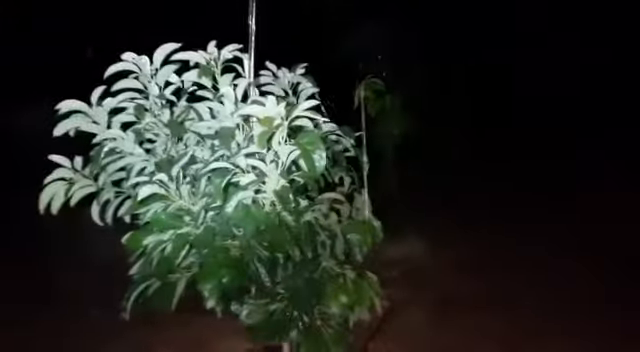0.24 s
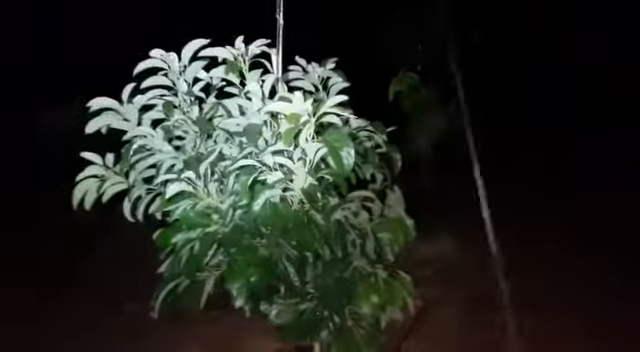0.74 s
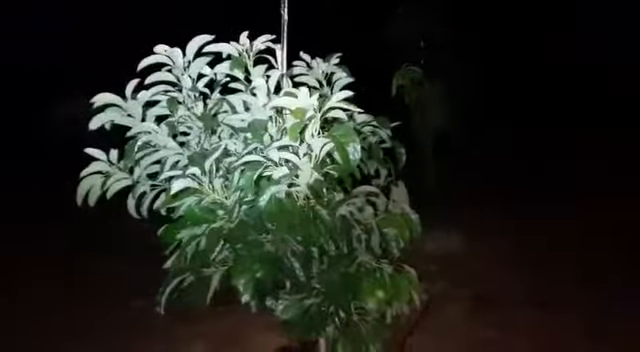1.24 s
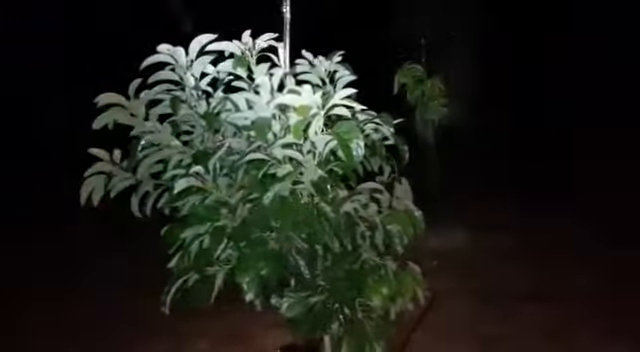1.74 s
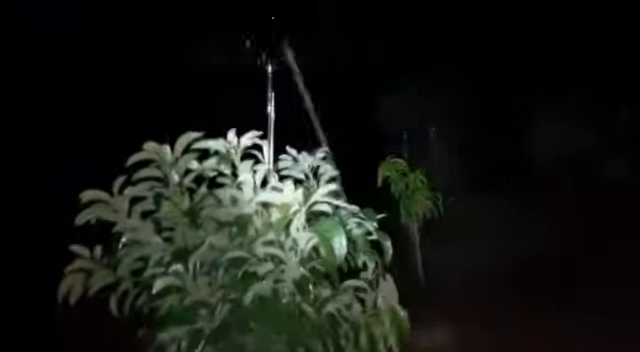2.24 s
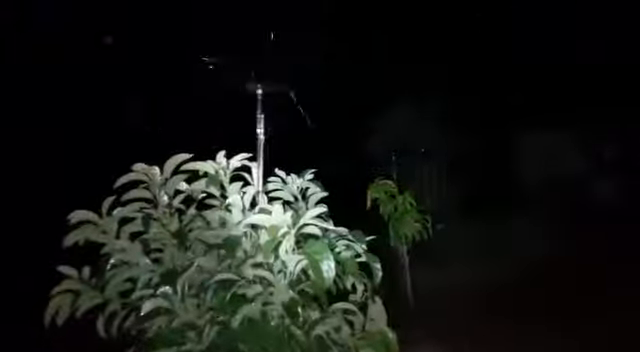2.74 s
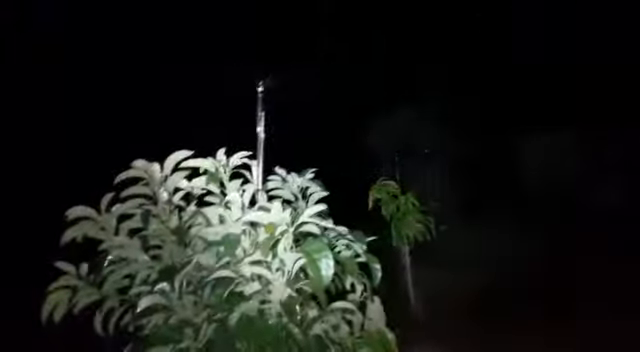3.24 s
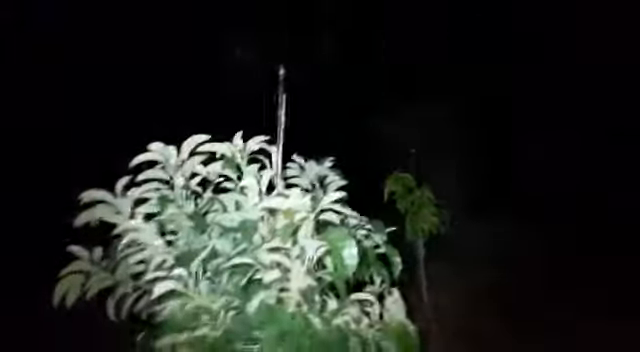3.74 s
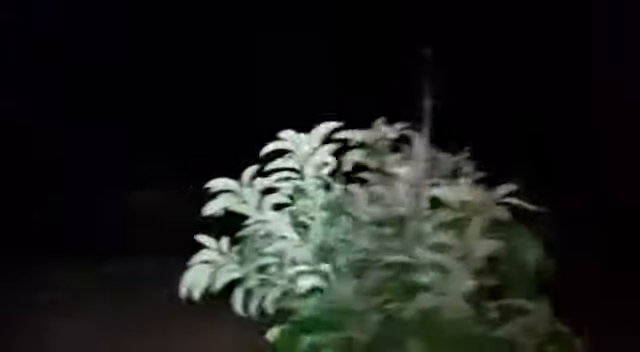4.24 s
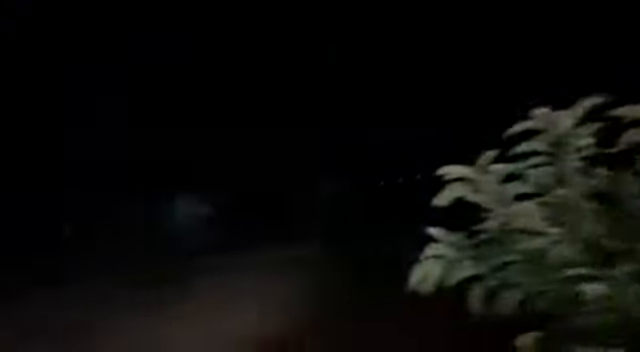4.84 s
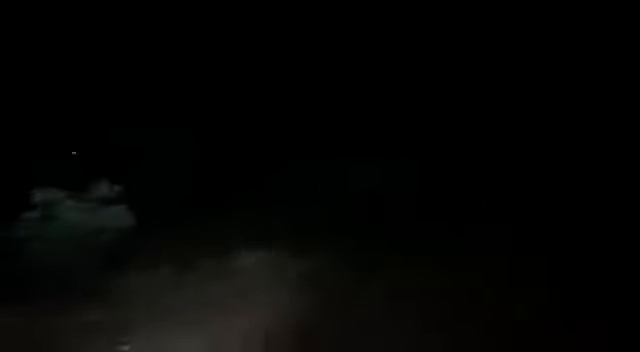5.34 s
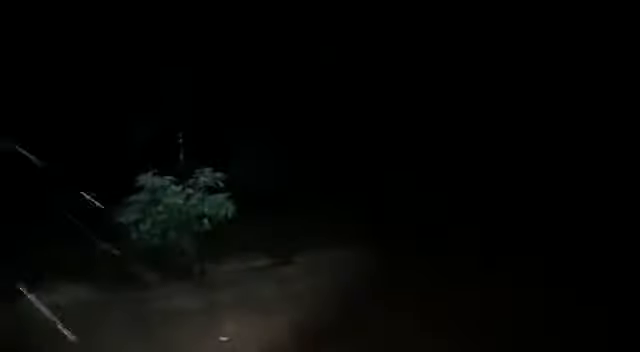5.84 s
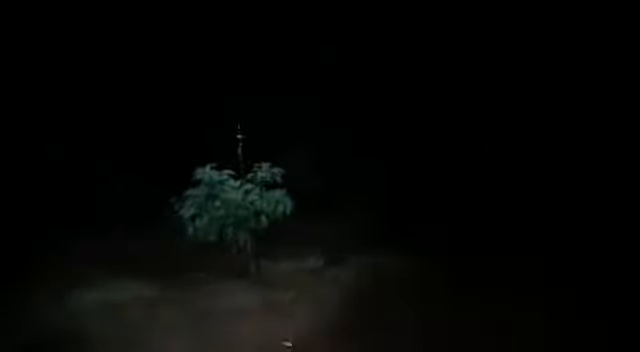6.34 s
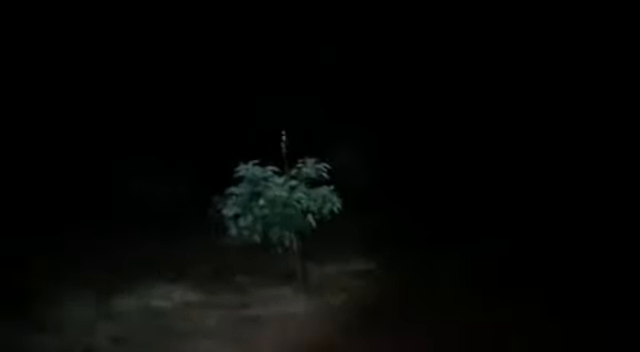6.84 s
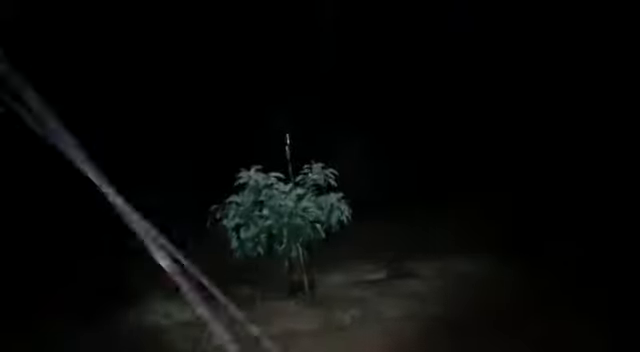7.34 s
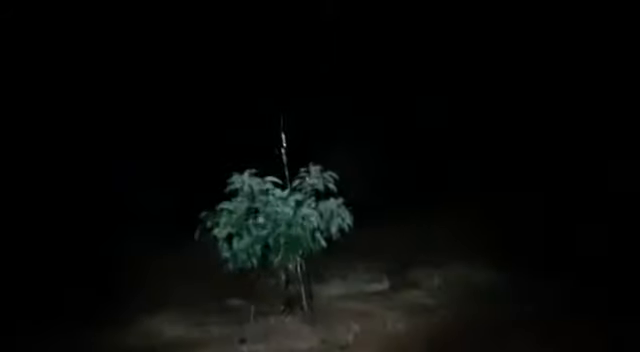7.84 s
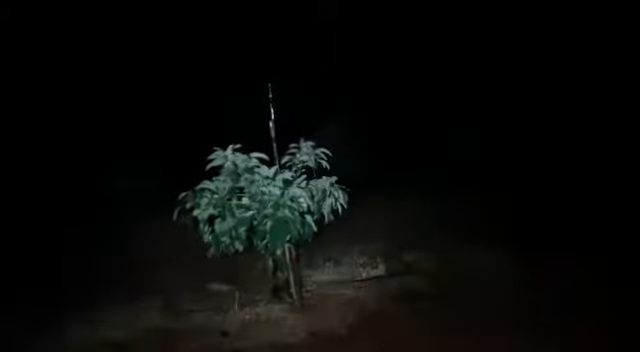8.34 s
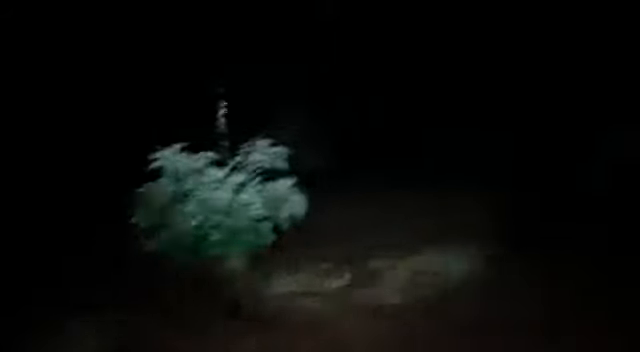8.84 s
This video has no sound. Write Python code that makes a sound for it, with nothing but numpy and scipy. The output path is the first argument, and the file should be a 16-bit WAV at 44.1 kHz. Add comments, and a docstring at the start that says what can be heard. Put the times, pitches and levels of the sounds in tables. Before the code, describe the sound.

Orchard sprinklers tick rapidly and overlap over a steady water hiss, with dripping leaves, then footsteps, snapping twigs and brief low wind thumps.

```python
"""Impact sprinklers in an orchard at night

Three sprinklers tick: each arm cuts its jet, knocks the plastic head with a ring of decaying tones, and throws
a splash of broken-up noise. Spray hisses as patchy noise, and drops tap on leaves as short pops.
Low noise in gusts is wind on the two ports of a hand-held phone, which turns and is carried along.
Feet shuffle through wet litter as swelling noise, and a few twigs snap as wide-band cracks."""
import sys
import numpy as np
from scipy import signal
from scipy.fft import rfft, irfft, next_fast_len
from scipy.io import wavfile
from scipy.ndimage import uniform_filter1d, map_coordinates

SR = 44100
rng = np.random.default_rng(int(sys.argv[2]) if len(sys.argv) > 2 else 0)


def waveform_to_disk(signal):
    """Save audio, clipped to [-1, 1], as 16-bit WAV at the path in sys.argv[1]."""
    frames = np.transpose(np.atleast_2d(signal))
    scaled = np.clip(frames, -1, 1) * 32767
    samples = np.round(scaled).astype(np.int16)
    wavfile.write(sys.argv[1], SR, samples)


N = 400595
LEAD_S = 0.008  # every short sound's row starts this long before its event


def sprinklers():
    """Three arms beat at their own rates, each heard from its own bearing."""
    # each arm's beat: start_s, swing_period_s
    arms = [(0, .1272), (0, .138), (7.5757, .1275)]
    # how each sprinkler runs as it turns: time_s, strike_late_ms, knock_gain_db, splash_gain_db
    runs = [
        [(0, 34, -34, -36.5), (.2, 28.4, -35, -43), (.5, 32.5, -28, -33.5), (.8, 37.5, -29.5, -38),
         (1.18, 32.6, -27.5, -37.5), (1.55, 30, -28.5, -33.5), (1.75, 31, -29.5, -36.5),
         (2.05, 28.8, -30, -39.5), (2.44, 29, -29.5, -35), (2.58, 29, -26.5, -41), (2.95, 35, -31.5, -39),
         (3.2, 35.3, -31.5, -36.5), (3.5, 37, -25.5, -42), (3.7, 37.3, -30.5, -39.5),
         (4.25, 36.6, -29.5, -38.5), (4.65, 33, -31, -35.5), (5, 33, -34, -38.5), (5.12, 33.6, -33.5, -44),
         (5.5, 27.7, -30, -31.5), (5.9, 24.5, -30, -45), (6.02, 22, -32, -45), (6.14, 28.4, -40, -43.5),
         (6.9, 27.7, -44, -42.5), (7.15, 38, -48, -60), (7.5, 32.5, -32.5, -51), (8.05, 35, -37, -36.5),
         (8.17, 27, -38, -44.5), (8.55, 19.3, -41, -38), (8.8, 26, -40, -49), (9.08, 29, -48, -35.5)],
        [(0, 12.5, -30, -37), (.3, 10, -40, -39.5), (.7, 7.5, -28, -43), (.9, 9, -39, -42),
         (1.2, 9.5, -30, -39.5), (1.4, 7, -37, -38.5), (1.53, 6, -28, -42.5), (2.6, 7.5, -31, -41.5),
         (2.77, 5.5, -29, -40), (2.9, 2, -33.5, -37.5), (3.4, 2, -31, -43), (3.6, 1, -29.5, -34),
         (3.85, -1, -33, -38), (4.13, 3.5, -30, -40), (4.6, -2.5, -44, -39.5), (4.97, 6, -25.5, -37),
         (5.35, 11.5, -29.5, -42), (5.85, 7.5, -36.5, -41), (6.2, -.5, -31, -36), (6.65, 9.5, -38, -42.5),
         (6.95, 15.5, -36, -40), (7.2, 16, -33, -37), (7.45, 13.5, -35, -51), (7.75, 9.5, -37, -40.5),
         (8.05, 7.5, -42, -45.5), (8.4, 3, -36, -51), (9.08, 3.5, -34, -46)],
        [(7.5, 2, -45, -48), (8, 0.5, -37, -43), (8.4, -0.5, -41, -43), (8.7, 4, -36.5, -46),
         (9.08, 2.5, -50, -58)],
    ]
    # where each stands as the phone turns: time_s, left_lag_ms
    bearings = [
        [(0, -0.052), (3.8, -0.083), (4.9, 0.3), (5.6, 0.49), (6.4, 0.53), (7, 0.44), (9, 0.22)],
        [(0, -0.31), (2.2, -0.314), (4.5, -.37), (5.7, -0.41), (6.6, -0.36), (9, -0.21)],
        [(7.5, -0.071), (9, -0.024)],
    ]
    # ringing tones of each plastic head: nominal pitch_hz, relative_level_db, t60_s
    heads = [
        [(1600, -10.5, 0.044), (1789, -14.5, 0.079), (1990, -9, 0.04), (2730, -16.5, 0.079), (3640, -3, 0.016),
         (4600, 19, 0.0046)],
        [(2126, -14, 0.052), (2880, -9, 0.039), (3660, -17, 0.015), (4950, 11.5, 0.0061), (9350, 6.5, 0.0096),
         (10500, -4.5, 0.016)],
        [(2200, -8, .03), (3570, 5.5, 0.041), (4300, 5.5, .015), (8200, -7.5, .012), (9800, 14.5, 0.01)],
    ]
    return sum(sprinkler(*one) for one in zip(arms, runs, bearings, heads))


def sprinkler(arm, run, bearing, head):
    """The arm slices the jet, knocks the head, the splash spreads, and the arm clips the jet again swinging back."""
    # colour of the splash: pitch_hz, relative_level_db
    splash_colour = [(300, -14.5), (900, -6.5), (1600, -2.5), (3000, 2), (6000, 6), (11000, 3),
                     (16000, -0.5)]
    s, knock_db, splash_db = strikes(arm, run)[..., None]
    t = event_time(0.09)

    def noise():
        white = rng.standard_normal((len(s), len(t)))
        return unit(filtered(white, lambda hz: amp(along(splash_colour, hz))))

    # the head rings a little differently at every blow
    ring = 0
    for hz, db, t60 in head:
        level = amp(db + 2.5 * rng.standard_normal(s.shape))
        detune = 1 + 0.016 * rng.standard_normal(s.shape)
        cycles = hz * t * detune + rng.random(s.shape)
        ring = ring + level * puff(t, 0.0012, t60) * np.sin(2 * np.pi * cycles)

    rattle = noise()
    crack = amp(2.0) * burst(puff(t, 0.0005, 0.011), rattle)
    rebound_gain = amp(-11 + 4.4 * np.clip(rng.standard_normal(s.shape), -2, 1))
    rebound = rebound_gain * puff(t - 0.0065, 0.0002, 0.013) * rattle
    blow = amp(-7) * ring + crack
    even_blow = unit(blow) * np.sqrt(np.mean(blow ** 2))  # same energy at each strike
    knock = amp(knock_db) * (even_blow + rebound)

    slice_in = amp(3.5) * puff(t + 0.0058, 0.0038, 0.026)
    spread = puff(t, 0.00074, 0.13)
    swing_back = amp(-13.0) * puff(t - 0.056, 0.0014, 0.039)
    jet = slice_in + spread + swing_back

    shared = splintered(noise(), depth_db=2.5)
    ears = []
    for _ in "lr":
        own = splintered(noise(), depth_db=6.0)
        ears.append(knock + amp(splash_db) * jet * (0.5 * shared + 0.84 * own))
    return place(s[:, 0], *ears, np.interp(s[:, 0], *np.transpose(bearing)))


def strikes(arm, run):
    """Times, knock dB and splash dB of one arm: an even beat, shifted by its lateness, with uneven force."""
    knock_varies_db, splash_varies_db = 1, 1.5
    start_s, period_s = arm
    beat = np.arange(start_s, N / SR - 0.03, period_s)
    late_ms, knock_db, splash_db = [c[np.round(beat * SR).astype(int)] for c in curve(run)]
    u = rng.standard_normal((len(beat), 2))
    knock_db = knock_db + knock_varies_db * u[:, 0]
    splash_db = splash_db + splash_varies_db * u[:, 1]
    return np.array([beat + late_ms / 1000, knock_db, splash_db])


def drops():
    """The nearest taps one by one, and a scatter of fainter ones all round; big low drops are nearly all pop."""
    # loudest taps on near leaves: time_s, relative_level_db, centre_hz, left_lag_ms
    near_taps = [(0.196, -34.5, 8900, -0.16), (0.504, -36, 3400, 0.25), (0.574, -30, 7600, -.45),
                 (0.742, -37, 1270, 0.29), (0.906, -36, 1250, -0.14), (1.033, -30.5, 6900, -.34),
                 (1.365, -32, 7700, 0.072), (1.478, -30.5, 8750, 0.46), (2.02, -35, 7500, -0.52),
                 (2.129, -31.5, 7300, .05), (2.443, -32.5, 2200, 0), (2.564, -35, 10250, -.05),
                 (2.671, -32, 7100, -.05), (3, -31.5, 7100, 0.047), (3.162, -37, 8100, -0.67),
                 (3.448, -35, 7440, -0.32), (3.487, -30, 4800, 0.5), (3.656, -36.5, 1600, -0.25),
                 (3.669, -33, 7500, .11), (3.778, -33, 5700, -.09), (3.941, -33.5, 7900, -0.73),
                 (4.328, -32.5, 8000, .2), (4.559, -28.5, 5900, -0.11), (4.697, -38, 5900, -.3),
                 (5.289, -34, 5300, -0.61), (5.743, -32.5, 1700, 0.57), (6.467, -33, 5730, -.34),
                 (6.497, -28, 7440, -0.27), (6.67, -32, 7500, -.11), (6.946, -33, 6750, -0.31),
                 (7.288, -31.5, 3600, 0.3), (7.42, -32, 8400, 0), (7.571, -29.5, 7500, -0.11),
                 (8.382, -30, 7200, -0.31), (8.489, -38, 6600, .25), (8.866, -31.5, 8100, -.43)]
    s, db, hz, lag_ms = np.transpose(near_taps)
    pop_db = -5 * np.log2(hz / 8000)
    near = ticks(s, db - pop_db, hz, 0 * s, lag_ms, rise=0.00037, t60=0.016, octaves=1.0,
                 pop_db=pop_db[:, None] + 5.5, tail_db=-14.0, length=1 / 20)
    u = rng.random((round(50 * N / SR), 4))  # 50 faint taps a second
    s = u[:, 0] * N / SR
    db = -50.5 + 12 * u[:, 1] ** 2
    hz = 2500 * 5 ** u[:, 2]
    lag_ms = 1.034 * u[:, 3] - 0.45
    faint = ticks(s, db, hz, 0 * s, lag_ms, rise=0.0005, t60=0.015, octaves=0.34,
                  pop_db=-5, tail_db=-20.5, length=1 / 40)
    return near + faint


def feet():
    """Soles land with a dull push, press the soil and crunch wet leaves, which crackle."""
    # soles landing: time_s, relative_level_db, centre_hz
    thuds = [(0.406, -48.5, 347), (3.577, -53, 170), (4.838, -43, 855), (5.098, -34, 320),
             (5.399, -42, 420), (5.453, -42, 546), (5.485, -37, 412), (5.748, -40, 218),
             (6.886, -43.5, 404), (7.196, -38, 390), (7.499, -48.5, 167), (7.895, -46.5, 570),
             (8.069, -34, 250), (8.1, -32.5, 191), (8.508, -38, 283), (8.617, -34.5, 184),
             (8.673, -41.5, 336)]
    # weight coming down on a foot: peak_s, fade_10db_s, soil_db, leaves_db, wet_crackle_db
    steps = [(.41, 0.11, -58, -53, -53), (4.63, 0.14, -59, -47.5, -54), (5.093, 0.11, -52.5, -46.5, -44),
             (5.495, .06, -48.5, -51, -47), (5.76, 0.12, -57, -51.5, -62), (6, 0.05, -53, -55, -53),
             (6.535, 0.05, -58, -42, -42), (7.2, 0.1, -51, -45, -51), (7.84, 0.2, -75, -63, -58.5),
             (8.073, 0.07, -48.5, -48, -49), (8.5, 0.2, -55.5, -54, -61), (8.62, 0.1, -53, -44.5, -45.5)]
    # slow shuffling under the steps, before its wobble: time_s, soil_db, leaves_db
    shuffle = [(0, -64, -59), (.3, -81, -66), (.9, -95, -77), (1.74, -62.5, -71), (2.2, -77, -85),
               (3.2, -79, -65), (3.6, -73, -68), (4.1, -63, -59.5), (4.9, -65, -60), (5.25, -63, -63.5),
               (5.7, -66, -51), (6.05, -54, -54.5), (6.45, -60, -57), (6.75, -58, -64), (7.4, -63.5, -57),
               (8, -63, -56.5), (9.08, -59.5, -64)]
    # colours of pressed soil, wet crackle and leaf litter: pitch_hz, relative_level_db
    soil_colour = [(100, -0.5), (200, -1.5), (300, 3.5), (450, -4), (800, -9), (2000, -46)]
    crackle_colour = [(600, -20), (1500, -3.5), (3000, 2), (6000, -2), (16000, -10)]
    litter_colour = [(250, -8.5), (600, -2.5), (1000, -2), (2500, -8.5), (6000, -7.5), (16000, -72.5)]
    # left-right likeness of the litter: pitch_hz, likeness (1 = identical)
    litter_alike = [(300, 1), (700, 0.71), (1500, 0.08), (4000, 0.23)]
    press_faster = 3.1  # the rise against the fade

    s, db, hz = np.transpose(thuds)
    landing = ticks(s, db, hz, 0 * s, 0 * s, rise=0.00261, t60=0.043, octaves=0.8,
                    pop_db=-4, tail_db=-39, length=1 / 10)

    at, fade, soil_db, leaves_db, crackle_db = np.transpose(steps)

    def fall_db(t):
        return 10 * np.maximum(-press_faster * t, t) / fade[:, None]

    gains = []
    for slow_db, peak_db in zip(curve(shuffle), (soil_db, leaves_db)):
        shuffling = amp(slow_db + 2.1 * wobble(25))
        gains.append(np.hypot(shuffling, swells(at, peak_db, fall_db)))
    press, crunch = gains
    soil = press * rush(soil_colour, [(300, 0.92)], patchy_db=2.0, grain_db=0.7)
    leaves = crunch * rush(litter_colour, litter_alike, patchy_db=3.0, grain_db=4)
    wet = rush(crackle_colour, [(3000, 0.59)], patchy_db=4.0, grain_db=5.0)
    return landing + soil + leaves + swells(at, crackle_db, fall_db) * wet


def snaps():
    """Twigs and stalks break close by as dry, wide-band cracks."""
    # each break: time_s, relative_level_db, centre_hz, left_minus_right_db, left_lag_ms
    breaks = [(4.927, -25.5, 5400, -3, 0), (4.996, -29, 3020, 1, 0.091), (5.021, -6, 7600, -2, -0.19),
              (5.054, -20, 9500, -3, 0), (5.071, -21.5, 5300, -1, 0.068), (5.083, -21.5, 2770, 0, -0.13),
              (5.097, -27, 6200, 8, 0), (5.101, -17.5, 10500, -4, 0.016), (5.114, -32, 6800, -2, 0),
              (5.184, -28, 7900, -2, 0), (5.441, -21, 7450, -4, .07), (5.481, -37, 2630, -3, .03),
              (5.579, -19.5, 4300, -2.5, -0.34), (5.977, -27.5, 7540, -5, 0.079), (6.205, -21, 7600, -6, 0),
              (6.521, -28, 3550, 0, -0.019)]
    return ticks(*np.transpose(breaks), rise=0.00015, t60=0.011, octaves=1.62,
                 pop_db=9.0, tail_db=-20.5, length=1 / 16)


def spray():
    """Jets and falling mist hiss as patchy noise; what the two channels share arrives first on the left."""
    # hiss before its slight wobble: time_s, level_db
    hiss_level = [(0.0, -43.5), (0.66, -45), (1.57, -45.5), (1.85, -44.5), (3.13, -47), (3.29, -45),
                  (3.54, -46), (4.42, -44), (4.78, -41), (4.95, -46.5), (5.21, -44.5), (5.59, -42),
                  (6.88, -45), (7.13, -40.5), (7.64, -45), (9.08, -45.5)]
    # colour of the mist: pitch_hz, relative_level_db
    mist_colour = [(150, -28), (400, -14), (550, -7), (1000, -10.5), (1600, 0.5), (3000, 1), (6000, 1.5),
                   (11000, -2.5), (16000, 3.5)]
    hiss = rush(mist_colour, [(300, 0.27), (1500, 0.1), (6000, 0.086)], patchy_db=4.0, grain_db=1.0)

    def turn(hz):
        lead_s = 0.000347  # left ahead of right
        return np.exp(1j * np.pi * hz * lead_s * np.array([[1], [-1]]))

    gain = amp(curve(hiss_level)[0] + 0.63 * wobble(8))
    return gain * filtered(splintered(hiss, depth_db=2.0), turn)


def wind():
    """Eddies thump each port on its own; their strength over about an eighth of a second follows the gust."""
    # gusts hitting the ports: peak_s, level_db, length_s
    gusts = [(0.056, -63, 0.06), (0.515, -59, 0.09), (1.6, -66, 0.42), (2.11, -51, 0.11), (2.8, -57, 0.38),
             (3.378, -44, 0.044), (3.57, -36.5, 0.16), (3.756, -41.5, 0.058), (4.03, -50, 0.21),
             (4.687, -57, 0.073), (5.5, -54, .12), (5.654, -41, 0.08), (5.76, -50, .04), (6.86, -59, 0.18),
             (7.99, -49.5, 0.14), (8.12, -53.5, 0.45), (8.63, -60, 0.054), (8.86, -48, 0.061),
             (8.956, -35, 0.11)]
    # colour of the buffeting: pitch_hz, relative_level_db
    buffet_colour = [(12, -41), (25, -3), (55, 6), (90, 4), (140, -4.5), (222, -16.5), (400, -30),
                     (520, -45), (880, -120)]
    breeze_db, gust_edge_db = -66, 15  # mean level between gusts; fall one length from the peak
    lumps = amp(2.2 * np.array([wobble(12), wobble(14)]) + [[-0.5], [0.5]])  # right port 1 dB up
    eddies = lumps * rush(buffet_colour, [(30, 0.44), (200, 0.25)], patchy_db=1.5, grain_db=1)
    power = uniform_filter1d(np.mean(eddies ** 2, axis=0), SR // 8)
    strength = np.sqrt(np.abs(power) + 0.05)
    s, db, length = np.transpose(gusts)
    gust = swells(s, db, lambda t: gust_edge_db * np.abs(t / length[:, None]) ** 1.1)
    breeze = amp(breeze_db + 1.4 * wobble(3.06))
    return np.hypot(gust, breeze) * eddies / uniform_filter1d(strength, SR // 16)


def ticks(s, db, hz, pan_db, lag_ms, rise, t60, octaves, pop_db, tail_db, length):
    """One sharp pop, a short burst of noise around the same pitch, and a faint scattered tail."""
    t = event_time(length)

    def band(f):
        return np.exp(-(np.log2((f + 1) / hz[:, None]) / octaves) ** 2)

    def noise():
        return unit(filtered(rng.standard_normal((len(s), len(t))), band))

    click = np.arange(len(t)) == np.argmax(t > 3 * rise)
    pop = filtered(np.tile(click, (len(s), 1)), lambda f: 1j * band(f))  # a push, then a pull
    pop = pop / pop.max(axis=1, keepdims=True)
    tick = amp(pop_db) * pop + burst(puff(t, rise, np.reshape(t60, (-1, 1))), noise())
    ears = []
    for side in (1, -1):
        tail = amp(tail_db) * puff(t, 0.0004, 0.15) * noise()  # its own in each channel
        ears.append(amp(db + side * pan_db / 2)[:, None] * (tick + tail))
    return place(s, *ears, lag_ms)


def rush(spectrum, alike, patchy_db, grain_db):
    """Stereo noise of rms 1 with patches of random gain and a grainy flicker."""
    z = signal.stft(rng.standard_normal((2, N)), nperseg=256)[2]
    field = uniform_filter1d(rng.standard_normal(z.shape[1:]), 6, axis=0)
    field = uniform_filter1d(field, 8, axis=1)
    patchy = z * amp(patchy_db * field / field.std())
    pair = signal.istft(patchy, nperseg=256)[1][:, :N]
    pair = pair * amp(grain_db * wobble(350))

    def mid_side(hz):
        # the mix of middle and side sets how alike the channels are
        turn = np.arccos(np.clip(along(alike, hz), -1, 1)) / 2
        return amp(along(spectrum, hz)) * [np.cos(turn), np.sin(turn)]

    mid, side = filtered(pair, mid_side)
    return unit(np.array([mid + side, mid - side]))


def splintered(x, depth_db):
    """Rows of noise broken into specks a few ms long and a kHz or so wide, like separate droplets."""
    z = signal.stft(x, nperseg=96)[2]
    field = uniform_filter1d(rng.standard_normal(z.shape), 3, axis=1)
    field = uniform_filter1d(field, 3, axis=2)
    specks = z * amp(depth_db * field / field.std())
    return unit(signal.istft(specks, nperseg=96)[1][:, :x.shape[1]])


def burst(envelope, noise):
    """Noise under an envelope, each row holding just the envelope's energy."""
    return unit(envelope * noise) * np.sqrt(np.mean(envelope ** 2, axis=-1, keepdims=True))


def puff(t, rise, t60):
    """An envelope that starts at t = 0, rises and dies away."""
    t = np.maximum(t, 0)
    return (1 - np.exp(-t / rise)) * amp(-60 * t / t60)


def swells(s, db, fall_db):
    """Gain of peaks at s, each falling away by fall_db(time from the peak, row), added in power."""
    t = np.arange(0, N + 64, 64) / SR
    power = np.sum(amp(db[:, None] - fall_db(t - s[:, None])) ** 2, axis=0)
    return np.interp(np.arange(N) / SR, t, np.sqrt(power))


def event_time(length):
    """Seconds from the event, for a row of this length in seconds."""
    return np.arange(round(length * SR)) / SR - LEAD_S


def place(times, left, right, lag_ms):
    """Sums one short sound per row into both channels, the left one lagging by lag_ms."""
    def turn(hz):
        return np.exp(-1j * np.pi * hz * np.reshape(lag_ms, (-1, 1)) / 1000)  # half the lag

    ears = filtered(left, turn), filtered(right, lambda hz: np.conj(turn(hz)))
    where = np.round(np.asarray(times) * SR).astype(int)[:, None] + np.arange(left.shape[1])
    lead = round(LEAD_S * SR)
    return np.array([np.bincount(where.ravel(), e.ravel(), N + SR)[lead:N + lead] for e in ears])


def filtered(x, response):
    """Rows of x times a response of frequency."""
    m = next_fast_len(x.shape[-1] + 1024)
    spectrum = rfft(x, m) * response(np.fft.rfftfreq(m, 1 / SR))
    return irfft(spectrum, m)[..., :x.shape[-1]]


def wobble(rate):
    """A smooth random curve, rate knots a second."""
    knots = rng.standard_normal(int(N * rate / SR) + 4)
    return map_coordinates(knots, [np.arange(N) * rate / SR])


def curve(rows):
    """One value per sample for each column after the time."""
    s, *columns = np.transpose(rows)
    return [np.interp(np.arange(N) / SR, s, c) for c in columns]


def along(points, hz):
    """(Hz, value) points read on a log axis."""
    f, v = np.transpose(points)
    return np.interp(np.log(hz + 1), np.log(f + 1), v)


def unit(x):
    """Each row at rms 1."""
    return x / np.sqrt(np.mean(x ** 2, axis=-1, keepdims=True) + 1e-20)


def amp(db):
    """dB to gain."""
    return 10 ** (np.asarray(db) / 20)


def scene():
    """All sources, out in the open with no walls."""
    return sprinklers() + drops() + feet() + snaps() + spray() + wind()


def record(dry):
    """The phone's ports colour the treble; nothing is kept above the band limit."""
    # colour of the ports: pitch_hz, gain_db
    ports = [(1200, -0.5), (2000, 1.5), (3300, -2.5), (4700, 0.5), (5800, -6), (7000, -11), (8000, -4.5),
             (10500, 1), (12500, -0.5), (14300, -8.5), (15600, -7.5), (15900, -29), (16400, -54)]
    top_hz = 16800
    return filtered(dry, lambda hz: amp(along(ports, hz)) * (hz < top_hz))


dry = scene()
out = record(dry)
waveform_to_disk(out)
```